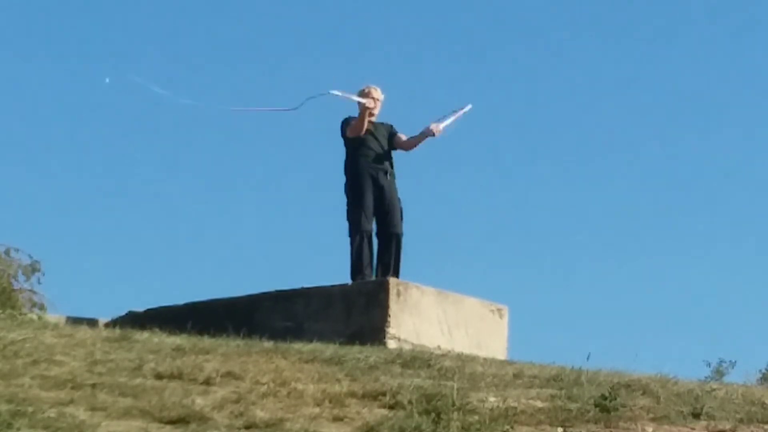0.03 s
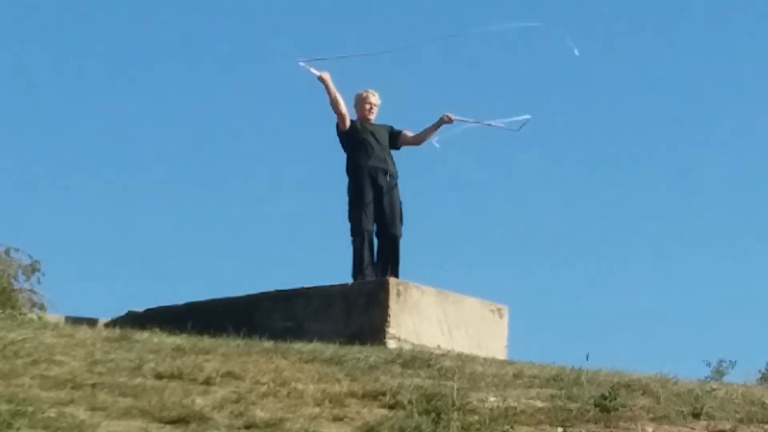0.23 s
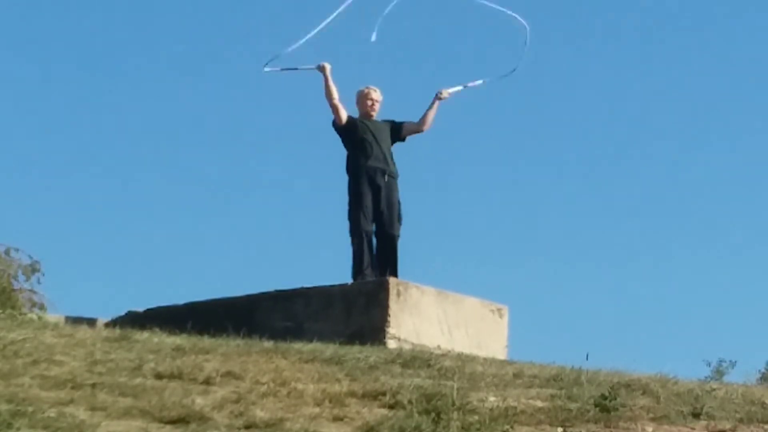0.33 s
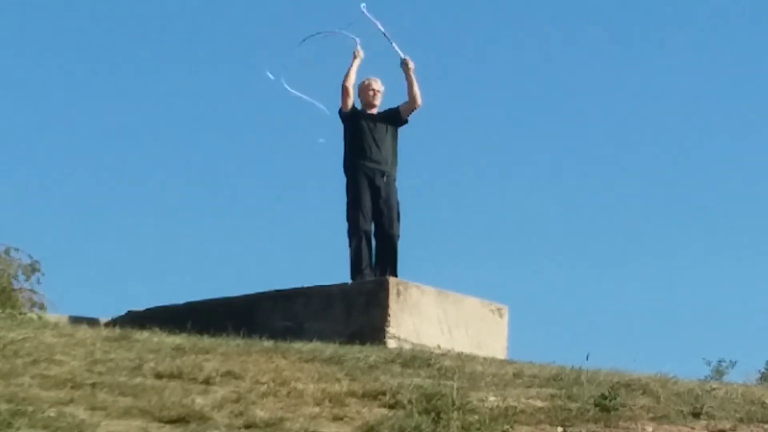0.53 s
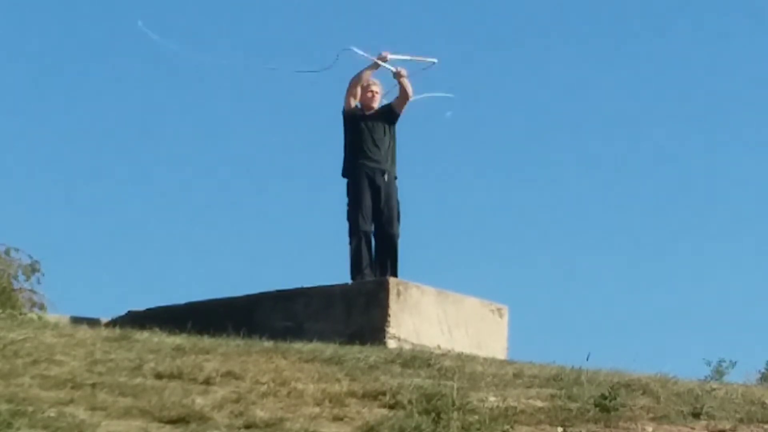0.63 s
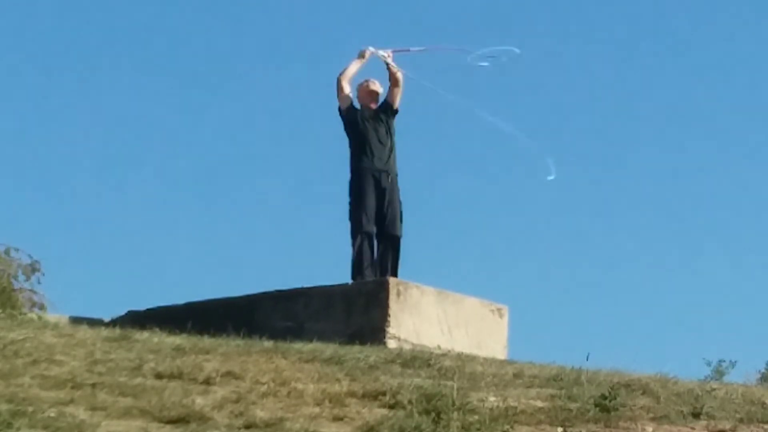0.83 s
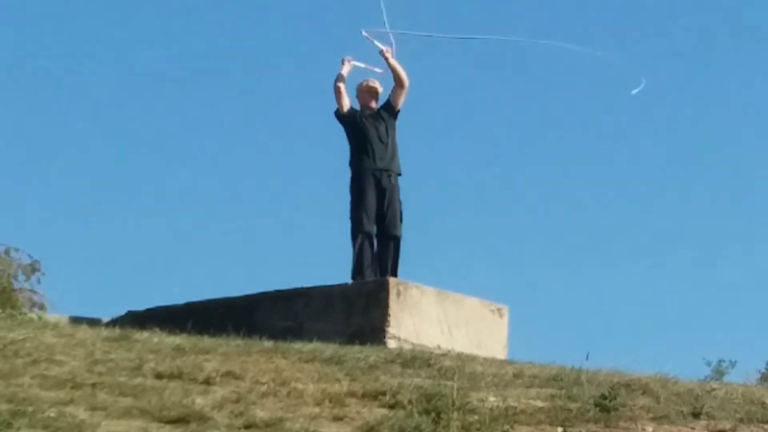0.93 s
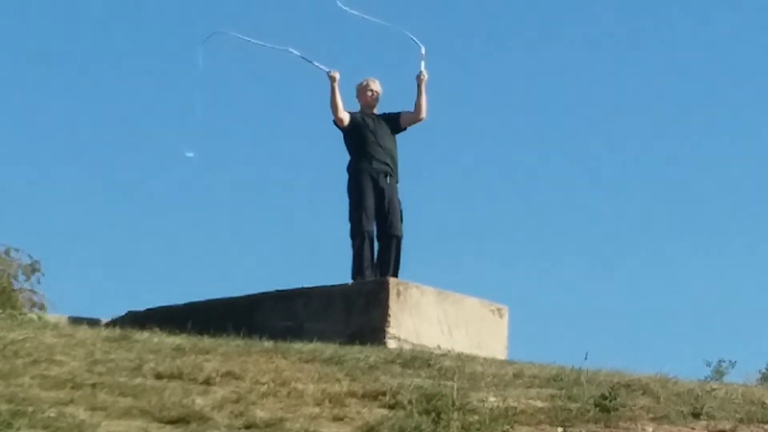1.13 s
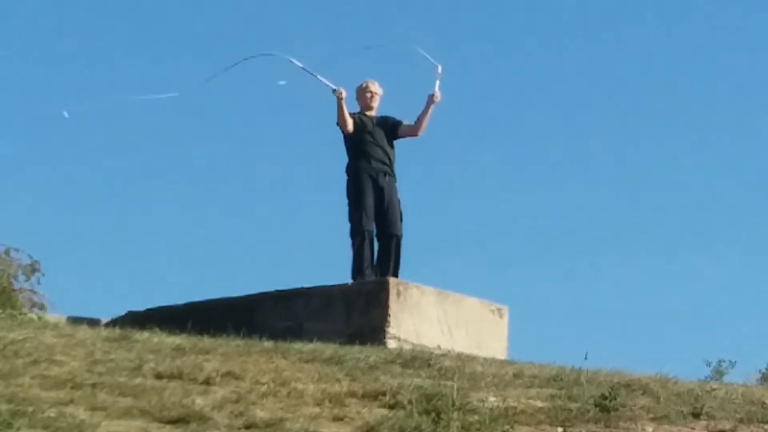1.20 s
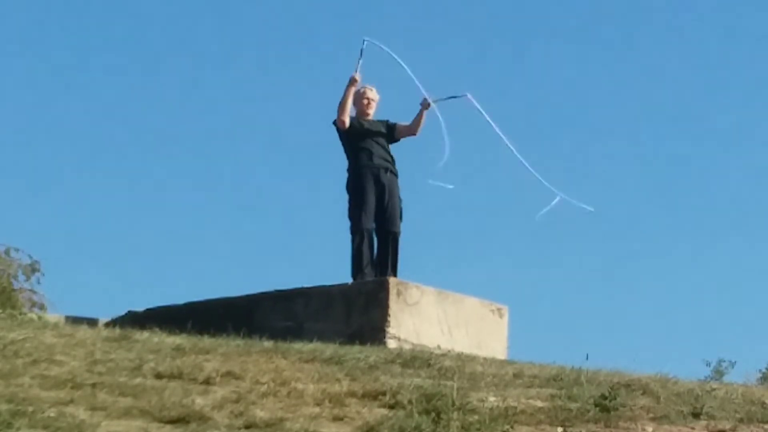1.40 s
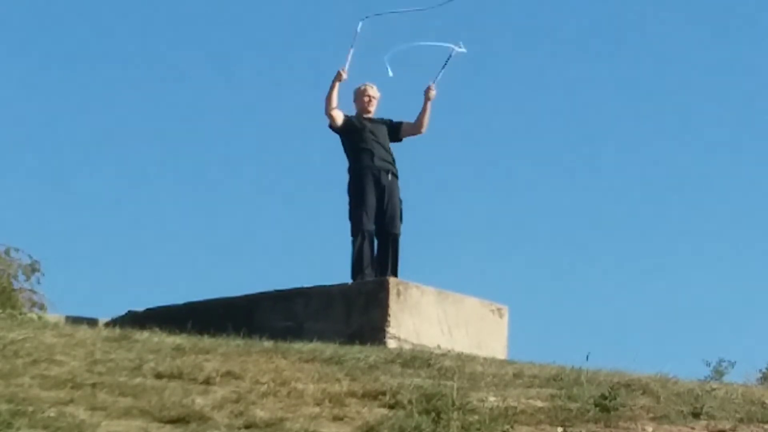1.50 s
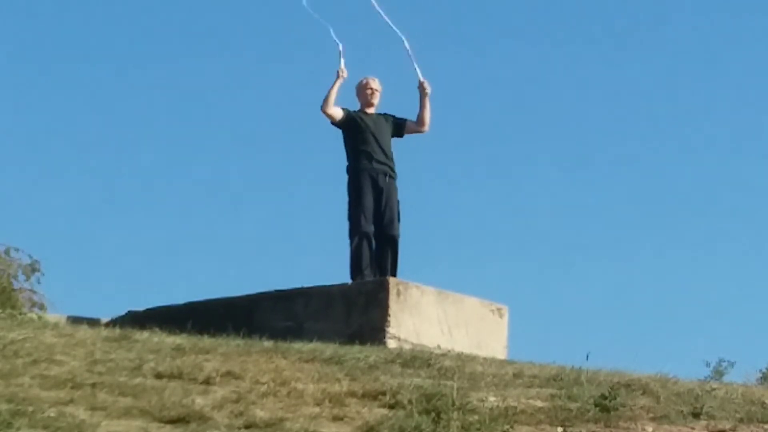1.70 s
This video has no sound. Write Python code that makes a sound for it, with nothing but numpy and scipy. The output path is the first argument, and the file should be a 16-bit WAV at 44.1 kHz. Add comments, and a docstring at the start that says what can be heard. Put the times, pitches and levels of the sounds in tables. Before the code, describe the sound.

Two whips crack in four loud, sharp pairs, with one weak crack after the first pair. Trees scatter back a short hissing tail and small distant ticks. The cracks come from straight ahead over a faint open-air rumble.

```python
"""Two whips are cracked on a mound in an open park. First come a faint outdoor rumble and the
fading echoes of an earlier crack. At 0.22 s both whips crack, a split second apart: each crack is
a shock pulse and its bounce off the ground. A weak crack follows at 0.52 s, then pairs near 0.8,
1.2 and 1.5 s. The hardest make the microphone ring and thump. After each pair, grass and trees
scatter the sound back as a swelling, grainy tail, with separate far echoes up to the end."""
import sys
import numpy as np
from scipy import signal
from scipy.fft import rfft, irfft
from scipy.io import wavfile

SR = 44100
rng = np.random.default_rng(int(sys.argv[2]) if len(sys.argv) > 2 else 0)


def persist_wave(psi):
    """Save psi, clipped to +-1, as 16-bit WAV."""
    counts = np.round(np.clip(psi, -1, 1) * 32767).astype(np.int16)
    wavfile.write(sys.argv[1], SR, np.atleast_2d(counts).T)


N = 77175
TIME = np.arange(N) / SR
# A "response" says what happens to each frequency. Multiplying responses applies them in turn.
FFT_SIZE = 2 * N
FREQ_HZ = np.fft.rfftfreq(FFT_SIZE, 1 / SR)
TOP_HZ, ECHO_TOP_HZ = 16300, 4100   # treble limits of the whole sound and of the echoes


def from_db(db):
    """Turn decibels into a number to multiply by."""
    return 10 ** (np.asarray(db) / 20)

def delay(seconds):
    """A response that makes a sound come later."""
    return np.exp(-2j * np.pi * FREQ_HZ * seconds)

def dull(hz):
    """A response that gently softens the treble above hz."""
    return 1 / (1 + 1j * FREQ_HZ / hz)

def treble_cut(hz, steepness):
    """A response that sharply removes the treble above hz."""
    return 1 / np.sqrt(1 + (FREQ_HZ / hz) ** (2 * steepness))

def resonance(hz, q, keep):
    """A response that keeps what is below, around or above hz; a higher q rings longer."""
    s = 1j * FREQ_HZ / hz
    return s ** ("below", "around", "above").index(keep) / (1 + s / q + s * s)

def wave(response):
    """The sound that a response makes of a click."""
    return irfft(response, FFT_SIZE)[..., :N]

def flicker(step_s):
    """A smooth random wobble, about 1 in size."""
    r = np.exp(-1 / (step_s * SR / 2))
    wobble = signal.lfilter([1], [1, -2 * r, r * r], rng.standard_normal(N))
    return wobble / wobble.std()

def noise_bands():
    """Noise in half-octave bands, nearly alike in both ears: gives (centre in Hz, noise)."""
    edges = 25 * 2 ** np.arange(0, 9.6, .5)
    for low, high in zip(edges, edges[1:]):
        band = signal.butter(3, [low, high], "band", fs=SR, output="sos")
        mid, side = signal.sosfilt(band, rng.standard_normal((2, N + SR // 2)))[:, -N:]
        yield np.sqrt(low * high), (mid + from_db(-12.5) * side * [[1], [-1]]) / mid.std()

def at_hz(table, hz):
    """Read a table at one frequency, blending the nearest rows."""
    row_hz, *columns = np.transpose(table)
    return [np.interp(np.log(hz), np.log(row_hz), column) for column in columns]


# Each row: frequency in Hz, level of the half-octave band there in dB.
AIR_LEVELS = [(30, -108), (50, -83), (80, -71), (130, -72.5), (180, -75), (260, -90), (450, -91),
              (1000, -80.5), (2500, -72), (3800, -82.5), (5400, -97), (10000, -99), (16000, -99)]

def outdoor_air():
    """A steady distant rumble and a faint hiss."""
    return sum(from_db(at_hz(AIR_LEVELS, hz)[0]) * noise for hz, noise in noise_bands())


def crack_ages():
    """For each crack: the seconds since it went off, and how strongly it reaches the park."""
    earlier_crack = (-0.082, -16)   # start in seconds, level in dB; only its tail is heard
    sent = [earlier_crack] + [(row[0], row[-1]) for row in WHIP_CRACKS]
    return [(np.maximum(TIME - start, 1e-9), from_db(db)) for start, db in sent]

def tail_level(fade_s, rise_s=.004):
    """The joint level of all the cracks' tails; each rises fast, then falls 60 dB in fade_s."""
    power = 0
    for age, gain in crack_ages():
        rise = 1 - np.exp(-age / rise_s)
        power = power + (gain * rise * from_db(-60 * age / fade_s)) ** 2
    return np.sqrt(power)

def swell_power(delay_s, width=.17):
    """A row of trees sends each crack back as a swell, strongest delay_s later."""
    return sum(gain ** 2 * np.exp(-(np.log(age / delay_s) / width) ** 2) for age, gain in crack_ages())

# Each row: frequency in Hz, near trees' swell in dB, tail in dB, seconds for the tail to fall 60 dB.
PARK_SCATTER = [(257, -78, -69.5, 0.33), (476, -65.5, -67, 0.3), (980, -76, -64.5, 2.8),
                (2137, -41, -59.5, 0.4), (2970, -48.5, -49.5, 1.1), (5000, -46.5, -61.5, 1.3),
                (7500, -59.5, -57, 0.39), (10000, -63, -60, 0.28), (16000, -66, -68, .27)]

def park_scatter(grain_s=0.0023):
    """Sound swells back from two rows of trees, the far one duller, then dies away in a grainy tail."""
    near, far = swell_power(delay_s=.071), swell_power(delay_s=.128)
    shared_grain_db = 2.44 * flicker(grain_s)
    out = 0
    for hz, noise in noise_bands():
        swell_db, tail_db, fade_s = at_hz(PARK_SCATTER, hz)
        far_gain = from_db(-7) / (1 + (hz / 4740) ** 2)
        swell = np.sqrt(near + far * far_gain ** 2) * from_db(swell_db)
        tail = tail_level(fade_s) * from_db(tail_db)
        grain_db = shared_grain_db + 2.84 * flicker(grain_s)
        grain_db /= 1 + (hz / 4500) ** 2   # the treble stays a smooth hiss
        bass_cut = min(1, hz / 150) ** 2
        out = out + noise * np.hypot(swell, tail) * from_db(grain_db) * bass_cut
    return out


def smeared_click(smear_s=0.002):
    """The tiny burst of noise that a click becomes on its way back."""
    return rng.standard_normal(N) * np.exp(-TIME / smear_s)

def trunk_ticks(per_second=74):
    """Single tree trunks send back many small echoes at random, fading slowly after each crack."""
    hits = rng.random(N) < per_second / SR
    level_db = -11.5 + 3 * np.clip(rng.standard_normal(N), -2, 1.5)
    clicks = hits * from_db(level_db) * tail_level(fade_s=1.8)
    burst = smeared_click()
    smear = rfft(burst / np.linalg.norm(burst), FFT_SIZE)
    tone = resonance(2740, q=0.91, keep="around") * treble_cut(ECHO_TOP_HZ, steepness=10)
    return wave(rfft(clicks, FFT_SIZE) * smear * tone)


# Each row: start in seconds (before the lag), level in dB (before the boost), centre pitch in Hz.
FAR_ECHOES = [(0.049, -35.5, 1830), (0.056, -32, 1920), (0.081, -40.5, 1070), (0.117, -36, 2900),
              (0.189, -47.5, 1550), (0.333, -26.5, 1880), (0.347, -35, 2640), (0.367, -44, 2800),
              (0.406, -25.5, 2710), (0.44, -41.5, 3030), (0.535, -38, 4140), (0.546, -44.5, 2170),
              (0.555, -39, 2420), (0.593, -49, 2010), (0.645, -36.5, 1800), (0.681, -34.5, 1860),
              (0.696, -23.5, 2460), (0.897, -29, 2500), (0.944, -32, 2040), (0.975, -35.5, 2520),
              (1.016, -29.5, 2630), (1.08, -45, 3140), (1.267, -32.5, 2040), (1.307, -27.5, 2050),
              (1.54, -24.5, 2340), (1.565, -36, 2260), (1.639, -33.5, 2650), (1.695, -35.5, 3164)]

def far_echoes(boost_db=8, lag_s=0.001802):
    """Far trees and walls send back short, smeared ticks that have lost their bass and treble."""
    out = 0
    for start, db, hz in FAR_ECHOES:
        tone = resonance(hz, q=1.23, keep="around") ** 2 * treble_cut(ECHO_TOP_HZ, steepness=10)
        tick = rfft(smeared_click(), FFT_SIZE) * tone
        tick /= np.linalg.norm(wave(tick))
        out = out + from_db(db + boost_db) * tick * delay(start + lag_s)
    return wave(out)


# Each row: start in seconds, level in dB, low edge in Hz, high edge in Hz, ground bounce delay in
# milliseconds, bounce and microphone ring in dB (both added to the level), microphone thump in dB,
# level sent into the park in dB.
WHIP_CRACKS = [(0.22, 15, 486, 10800, .54, -6.5, -44, -8, 0.5),
               (.2390, 12.5, 600, 1940, 1.13, -12, -26.5, -59.5, -20),
               (0.5233, -9.5, 663, 3860, .83, -33, -5, -60, -36),
               (0.8307, 19.5, 745, 3150, 0.79, -11.5, -5.5, -19.5, -4.5),
               (0.8408, 8.5, 443, 3000, 1.01, -11.5, -13.5, -58.5, -7),
               (1.1782, 7.5, 1310, 1094, 0.28, 1.6, -36, -78, -46),
               (1.2223, 12, 710, 3410, 0.959, -6.5, -15, -48, -9),
               (1.4532, 20, 794, 3300, 0.713, -13.5, -8.5, -15, -2.5),
               (1.4746, 16.5, 868, 2930, 0.66, -22, -40, -47, -10)]

def whip_cracks():
    """Each shock pulse bounces off the ground, jolts the microphone and gets a faint, bright echo."""
    ring, thump = microphone_ring(), microphone_thump()
    out = 0
    for start, db, low_hz, high_hz, bounce_ms, bounce_db, ring_db, thump_db, _ in WHIP_CRACKS:
        shock = resonance(low_hz, q=0.54, keep="above")
        shock *= resonance(high_hz, q=0.95, keep="below") * dull(high_hz)
        bounce = shock * from_db(bounce_db) * delay(bounce_ms / 1000) * dull(6354)
        crack = from_db(db) * (shock + bounce + from_db(ring_db) * ring)
        out = out + delay(start) * (crack + from_db(thump_db) * thump)
    bright_echo = from_db(-37.5) * delay(.1575) * resonance(8900, q=0.65, keep="above")
    return wave(out * (1 + bright_echo) * treble_cut(TOP_HZ, steepness=10) ** 2)

def microphone_ring(hz=3333, q=5.5):
    """The microphone rings briefly just after a shock hits it."""
    return resonance(hz, q, keep="around") / q * delay(0.000329)

def microphone_thump(recovery_s=0.0064):
    """The overloaded microphone snaps brightly and swings back through its bass cut with a thump."""
    recovery = -SR / (1 / recovery_s + 2j * np.pi * FREQ_HZ)
    bass_cut = resonance(63, q=0.98, keep="above") ** 3
    snap = from_db(2) * resonance(10650, q=3.7, keep="around")
    return recovery * bass_cut * dull(453) + snap


def scene():
    """Everything comes from straight ahead, a hair later and louder on the right."""
    left, right = whip_cracks() + far_echoes() + trunk_ticks() + park_scatter() + outdoor_air()
    right = from_db(0.29) * wave(rfft(right, FFT_SIZE) * delay(9.2e-6))
    return np.array([left, right])

def record(dry):
    """The highest peaks are flattened, then the very top of the treble is cut."""
    clipped = np.clip(dry, -.97, .97)
    return wave(rfft(clipped, FFT_SIZE) * treble_cut(TOP_HZ, steepness=60))


dry = scene()
out = record(dry)
persist_wave(out)
```